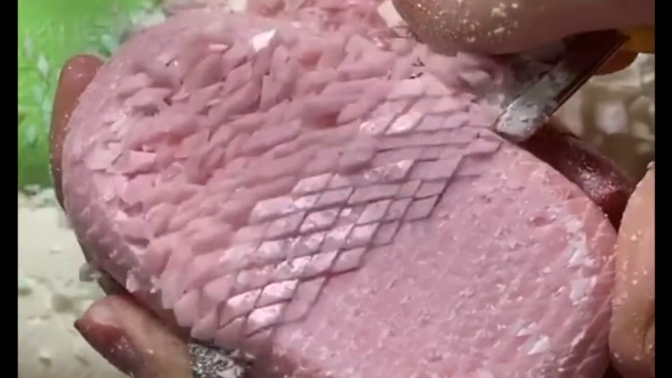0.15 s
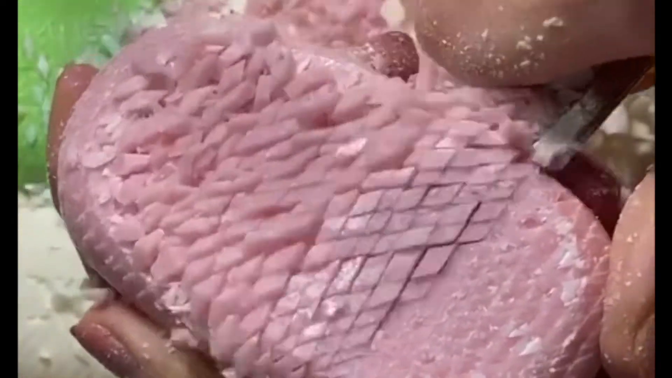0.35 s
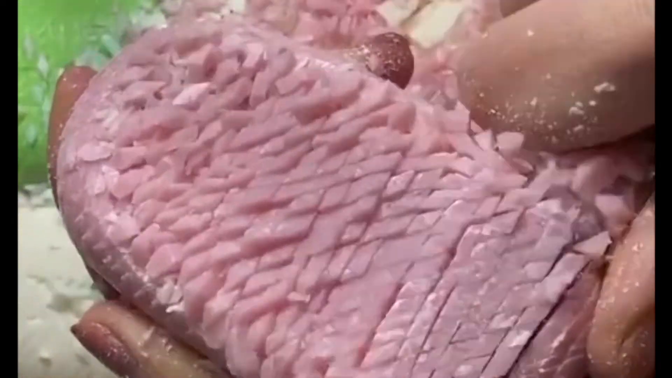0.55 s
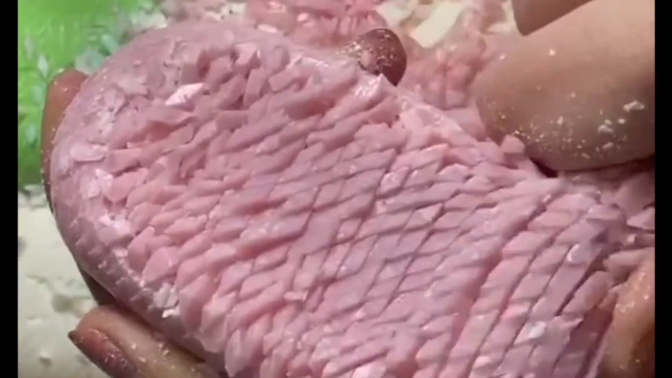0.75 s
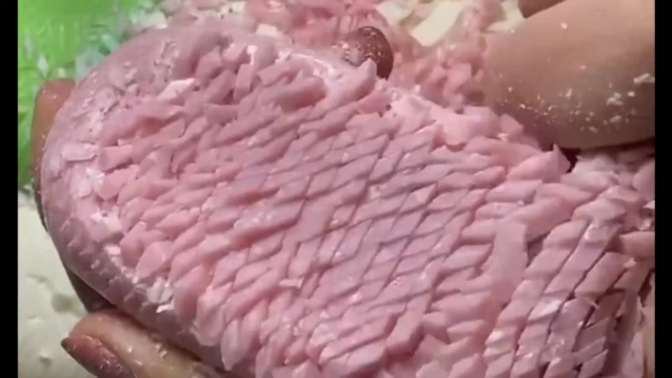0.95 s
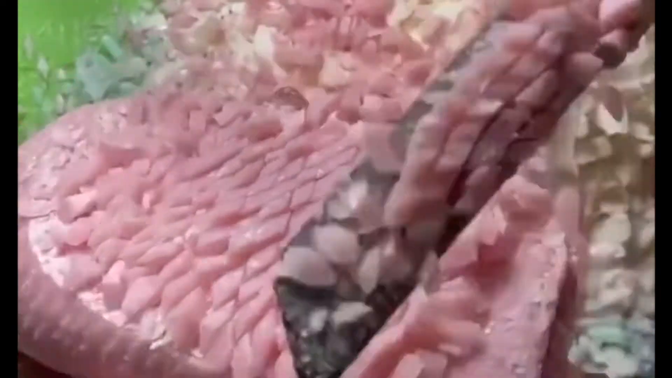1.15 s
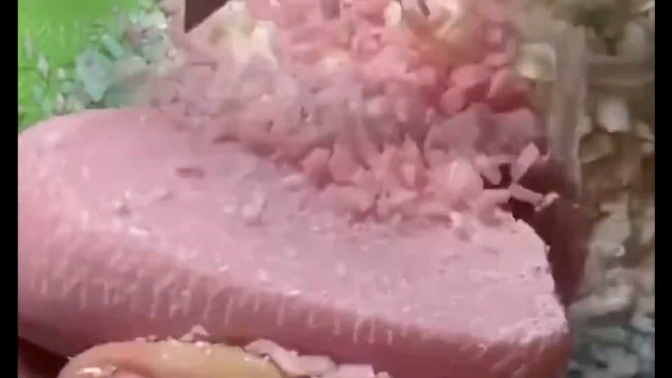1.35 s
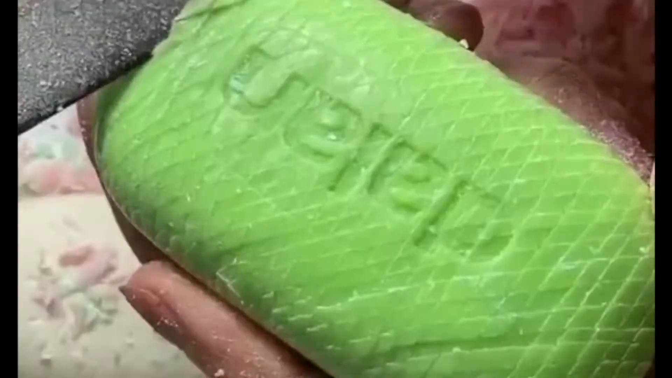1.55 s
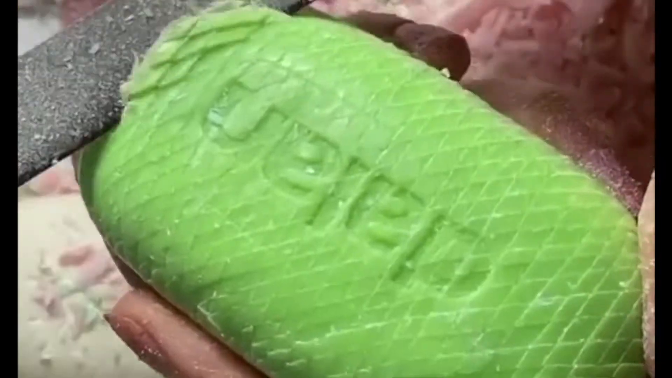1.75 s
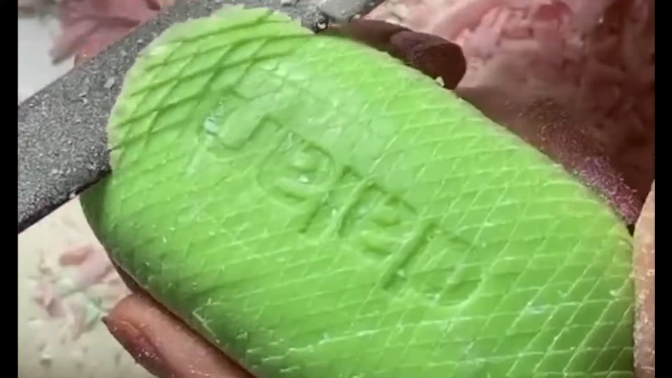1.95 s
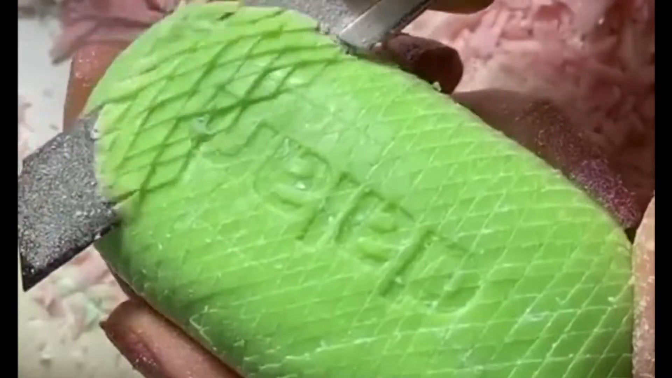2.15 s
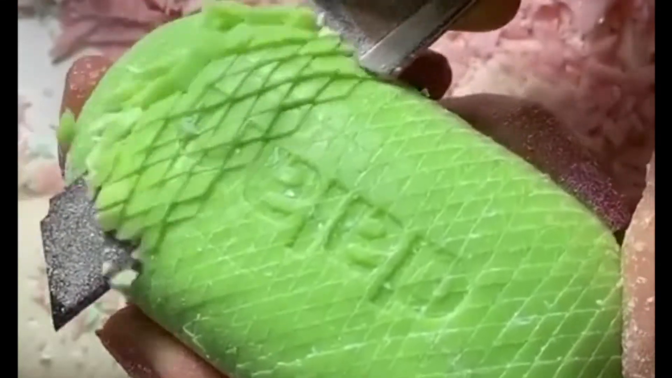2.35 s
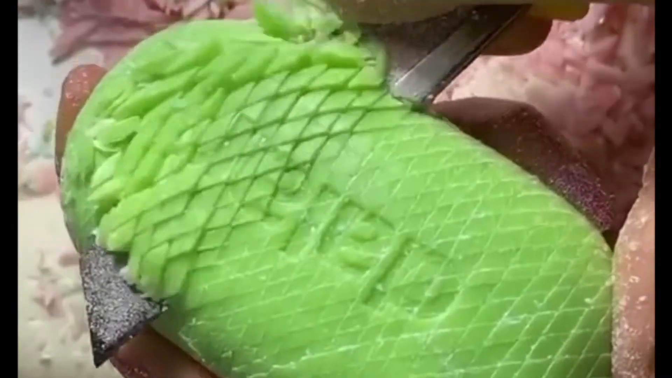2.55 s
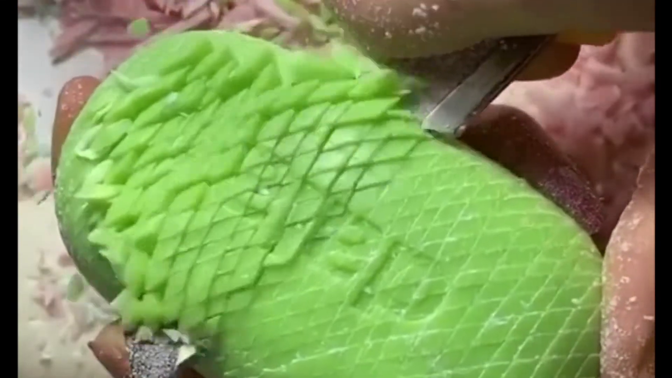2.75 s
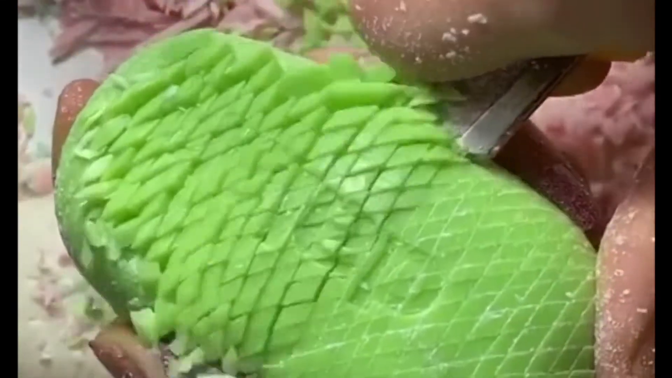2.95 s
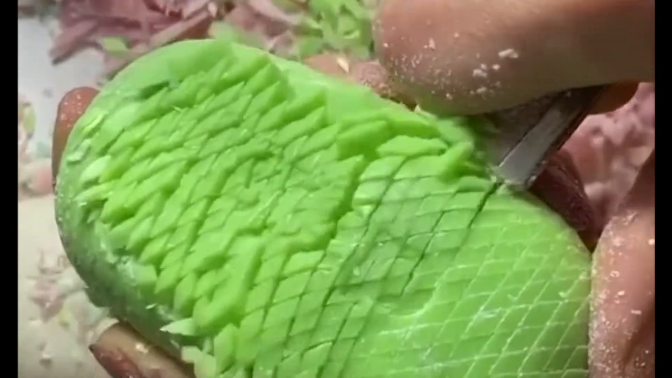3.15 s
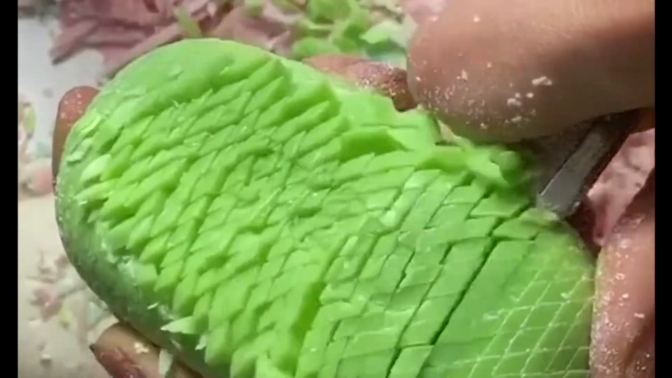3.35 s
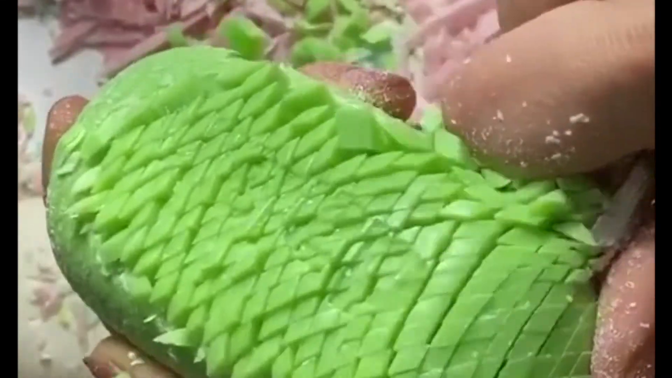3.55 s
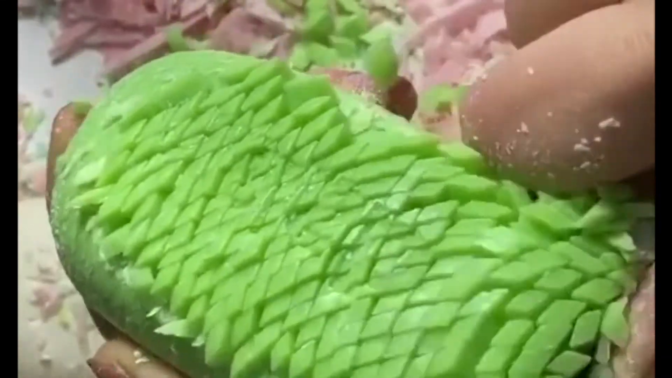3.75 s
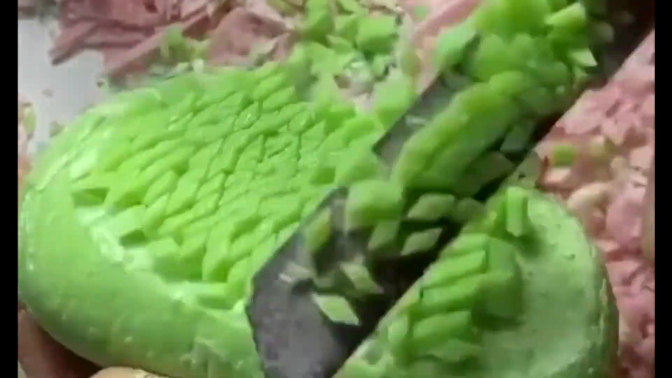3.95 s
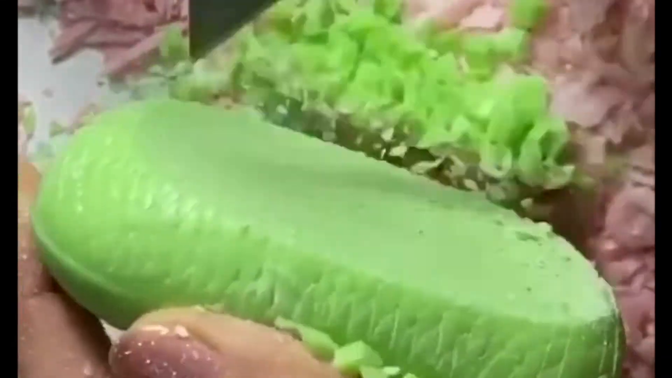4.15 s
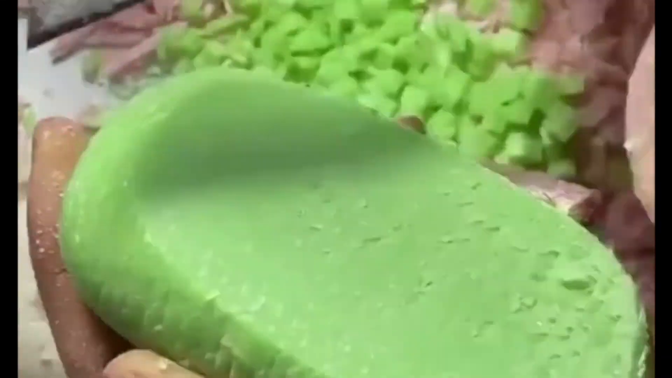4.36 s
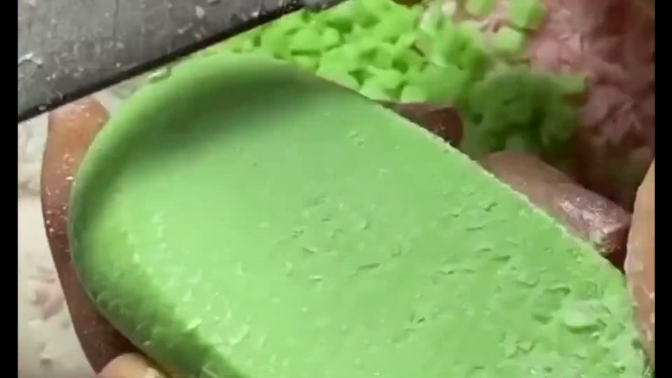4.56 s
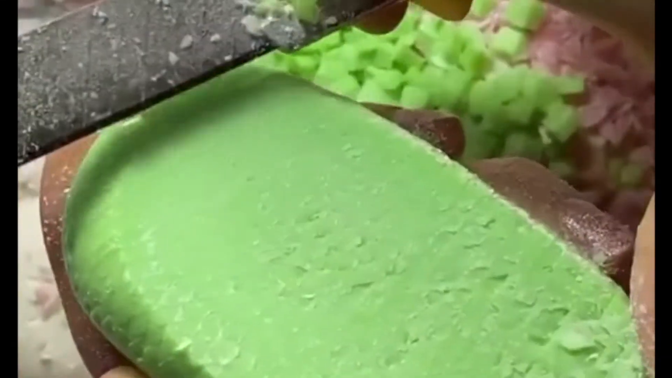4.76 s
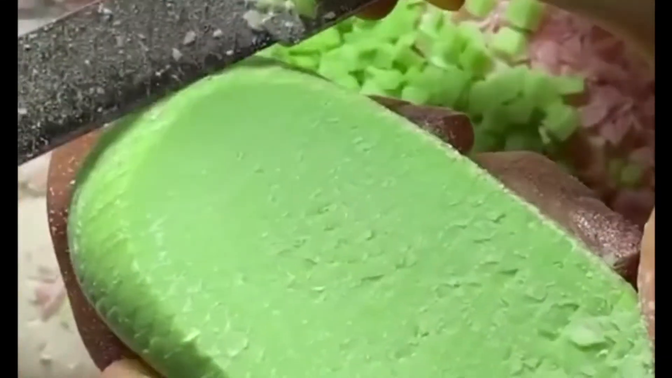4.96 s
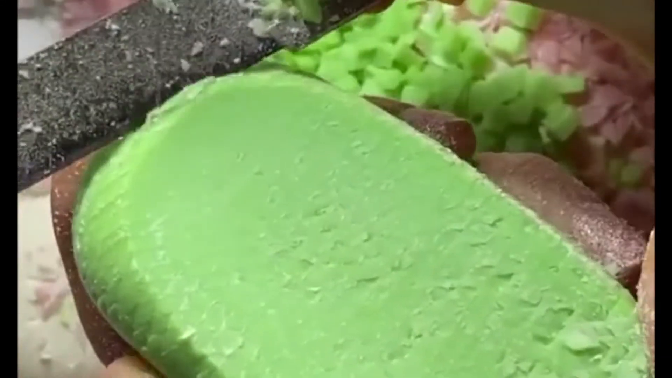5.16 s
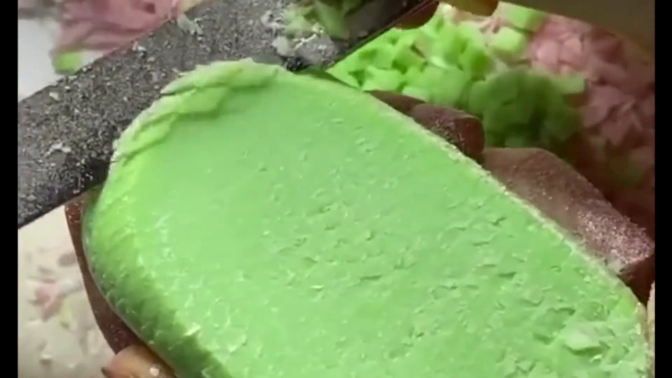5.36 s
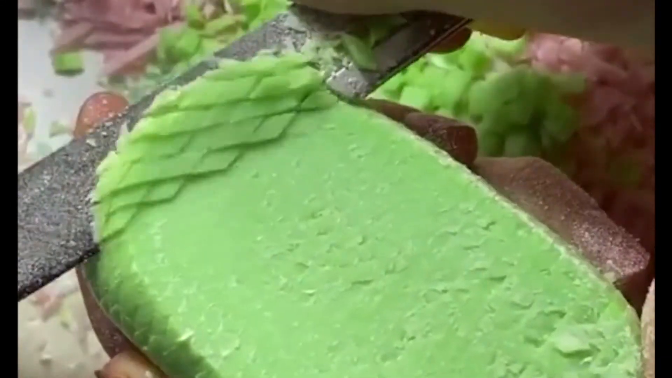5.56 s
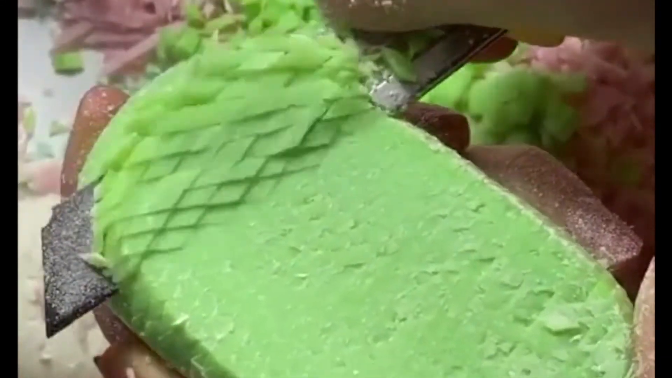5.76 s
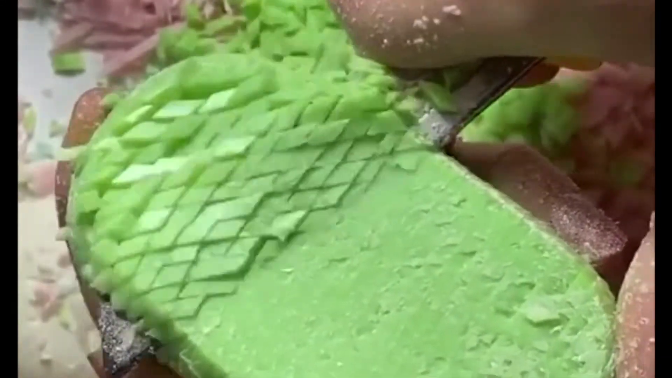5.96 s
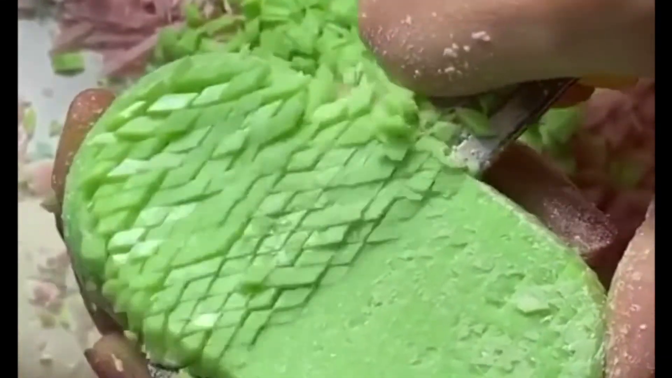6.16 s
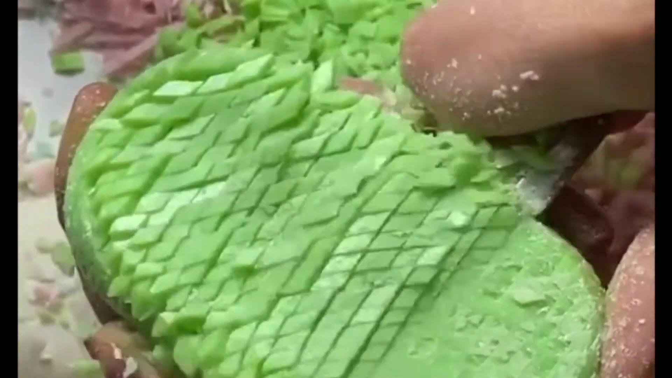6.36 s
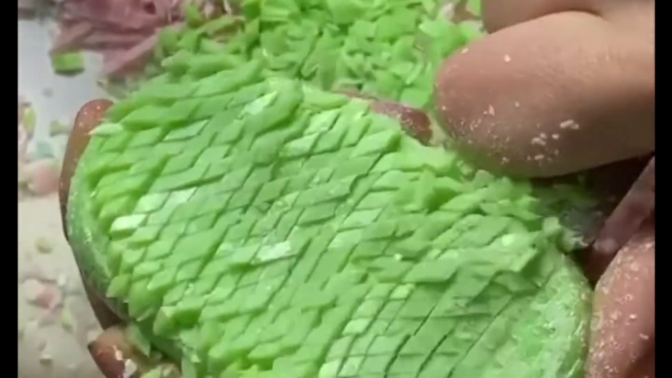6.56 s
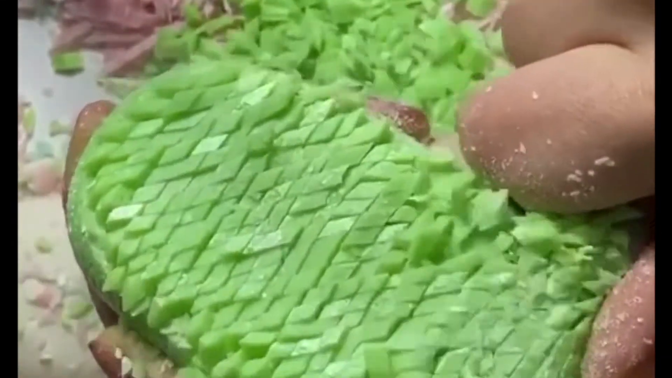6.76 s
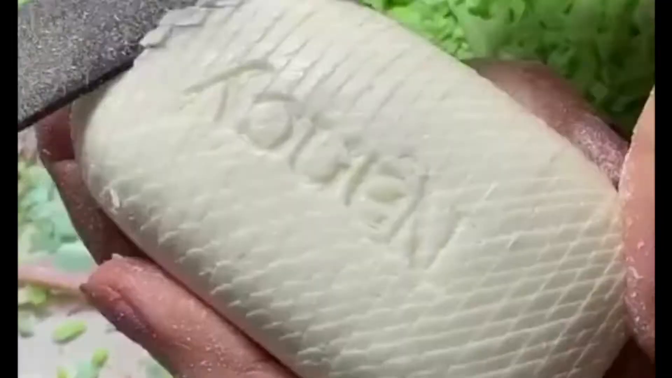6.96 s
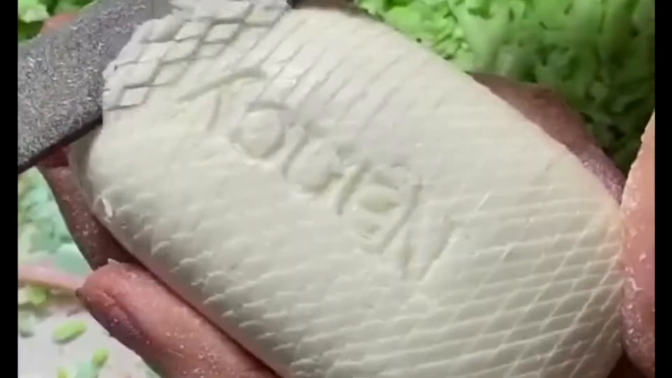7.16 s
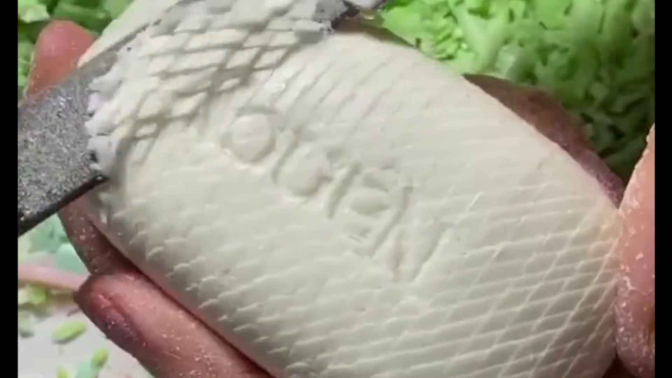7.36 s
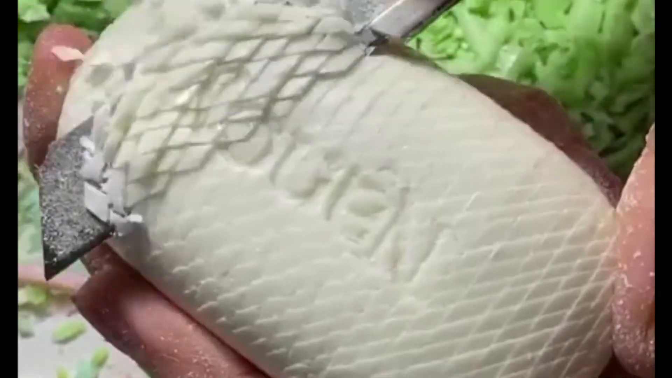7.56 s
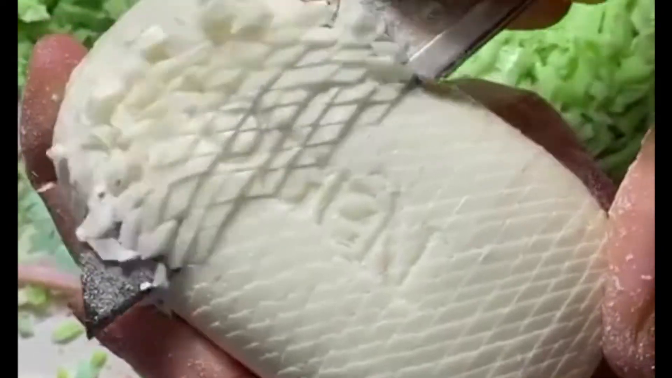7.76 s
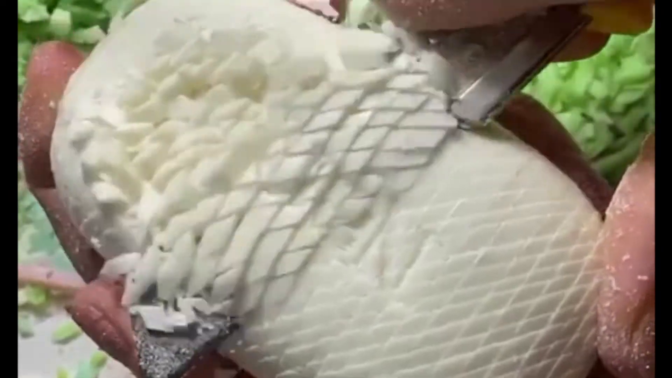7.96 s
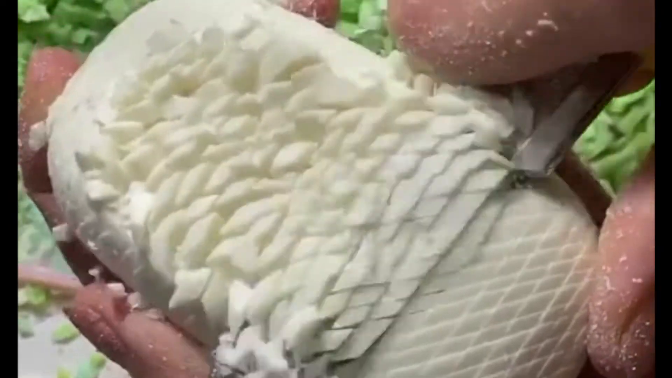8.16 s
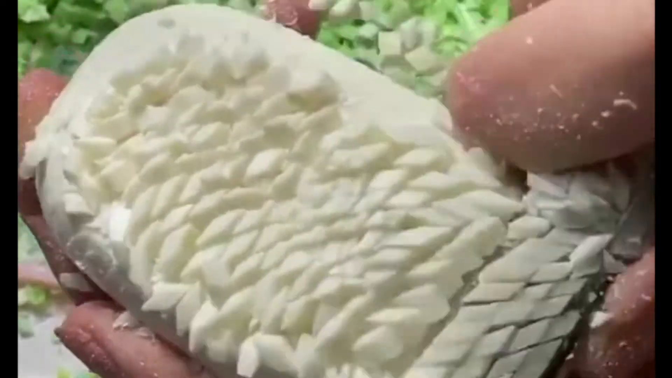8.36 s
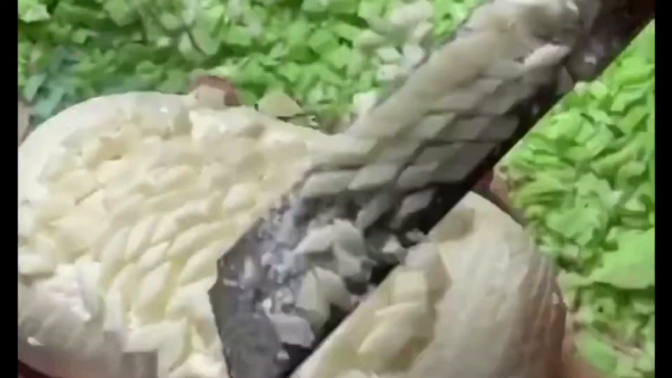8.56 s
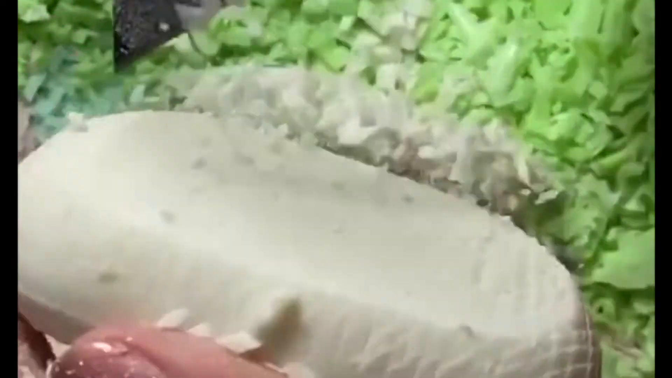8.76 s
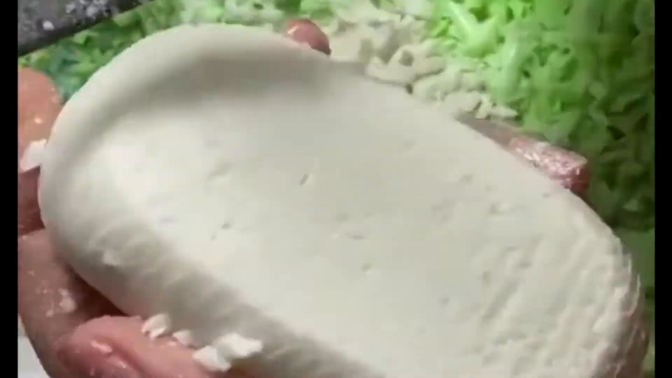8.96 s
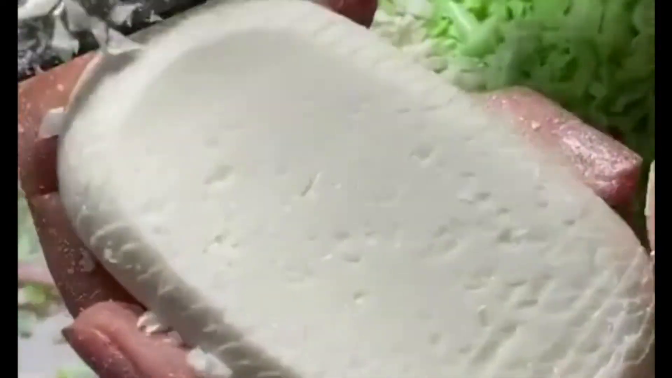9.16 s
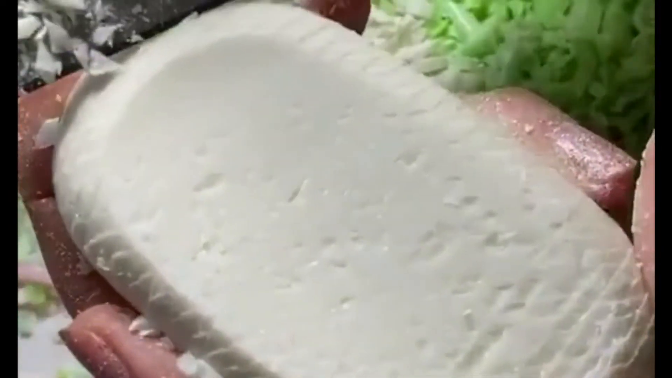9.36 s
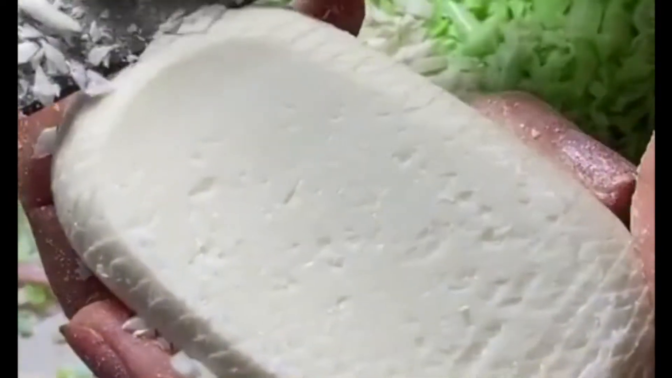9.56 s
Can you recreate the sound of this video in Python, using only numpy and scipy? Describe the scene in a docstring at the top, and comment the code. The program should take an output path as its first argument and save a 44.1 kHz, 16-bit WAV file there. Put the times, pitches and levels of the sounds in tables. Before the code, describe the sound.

Close, brittle crackling and crunching as a blade cuts dry soap into little cubes, with dull knocks and soft swishes of falling crumbs.

```python
"""A crackling flurry of sharp snaps: a knife is pushed through scored bars of dry soap, close to a
two-port microphone in a small quiet room. Cubes and finer crumbs part by brittle fracture, each crack an
impulse that excites the damped modes of bar and cubes as a thud, a ring and a sizzle. Blade and falling
chunks knock, the hands rumble through the bar and loose crumbs slide off in soft swishes.
The blade rests between passes, and twice the whole sound dips abruptly and recovers."""
import sys
import numpy as np
from scipy import signal
from scipy.fft import rfft, irfft, next_fast_len
from scipy.io import wavfile
from scipy.ndimage import uniform_filter1d

SR = 44100
rng = np.random.default_rng(int(sys.argv[2]) if len(sys.argv) > 2 else 0)


def wav_record(signal):
    """Record a signal, one row per channel, as 16-bit PCM in the file named by sys.argv[1]."""
    frames = np.transpose(np.atleast_2d(signal))
    bounded = np.clip(frames, -1, 1)
    # unit amplitude maps onto the largest positive 16-bit level
    quanta = np.round(bounded * 32767).astype(np.int16)
    wavfile.write(sys.argv[1], SR, quanta)


N = 424230
N_FFT = next_fast_len(N)
TIME_S = np.arange(N) / SR
BIN_HZ = np.fft.rfftfreq(N_FFT, 1 / SR) + 1  # offset keeps logarithms and quotients finite


def undb(db):
    """Amplitude ratio: a factor of ten for every 20 dB."""
    return 10 ** (np.asarray(db) / 20)


def shape(points):
    """Spectral envelope: gain per bin, with level interpolated over log frequency."""
    hz, db = np.transpose(points)
    return undb(np.interp(np.log(BIN_HZ), np.log(hz), db))


def colour(x, gain):
    """Linear filtering by multiplication of the spectrum."""
    return irfft(rfft(x, N_FFT) * gain, N_FFT)[..., :N]


def unit(x):
    """Normalisation to an rms of 1."""
    return x / np.sqrt(np.mean(x ** 2))


def decay(x, tau_s):
    """First-order relaxation: each impulse leaves an exponential tail."""
    return signal.lfilter([1], [1, -np.exp(-1 / (tau_s * SR))], x)


def port_noise():
    """Partial coherence: weakly correlated noise for the sum and the difference of the ports."""
    noise = rng.standard_normal((2, N))
    return np.array([noise[0], 0.13 * noise[0] + noise[1]])


# Crumb crackle, one list per pass of the blade or fall of crumbs: t/s, ring level/dB, thud level/dB
CRACKLE = [
    [(0, -50, -44.5), (.11, -50, -60), (.3, -36, -44.5), (.4, -27, -39.5), (.49, -24, -35), (.54, -32, -44)],
    [(.59, -39.5, -56), (.86, -53.5, -61.5), (1.08, -58, -57), (1.23, -41, -48.5), (1.39, -52, -58),
     (1.43, -69, -58.5)],
    [(1.55, -67.5, -77), (2.03, -54, -64), (2.27, -49, -59.5), (2.48, -43, -52), (2.77, -42, -56),
     (3, -35.5, -45), (3.2, -42.5, -52), (3.45, -40, -48), (3.57, -41.5, -47.5)],
    [(3.62, -48, -56.5), (3.83, -53, -56.5), (4, -45.5, -54.5), (4.14, -44.5, -47.5), (4.27, -54, -55.5),
     (4.35, -97, -66)],
    [(5.2, -63, -66), (5.46, -51, -59), (5.7, -46, -60), (6.15, -41.5, -51), (6.64, -46.5, -53.5),
     (6.7, -46, -52), (6.84, -49, -69), (6.93, -76, -68.5)],
    [(6.95, -60, -42.5), (7.12, -69, -65), (7.22, -36, -45.5), (7.4, -44.5, -54.5), (7.6, -37, -48.5),
     (7.75, -32, -47.5), (7.95, -41.5, -48.5), (8.05, -25, -40), (8.19, -27, -34)],
    [(8.23, -46, -52), (8.31, -72, -61), (8.51, -58.5, -70), (8.7, -47, -47), (8.77, -61, -56.5),
     (8.92, -53.5, -65), (9, -83.5, -90)],
]
# The blade at rest: start t/s, end t/s
BLADE_RESTS = [(3.67, 3.76), (4.36, 5.19), (8.27, 8.36), (9.01, 9.62)]


def crackle_levels():
    """Amplitude envelopes of the crumbs' thud, ring and sizzle, 40 dB lower while the blade rests."""
    s, ring, thud = np.concatenate(CRACKLE).T
    resting = sum((TIME_S > start) & (TIME_S < end) for start, end in BLADE_RESTS)
    ring_db = np.interp(TIME_S, s, ring) - 40 * resting
    thud_db = np.interp(TIME_S, s, thud) - 40 * resting
    sizzle_db = ring_db - 3 + 0.66 * (thud_db - ring_db)
    return thud_db, ring_db, sizzle_db


def crumbs(break_at, ring_db, patchiness, per_s=800, spread_db=4.5, bunch_db=6, ceiling_db=12):
    """Poisson process of tiny fractures, whose sizes bunch and flare up after each larger break."""
    chance = rng.random((N, 2))
    at = np.flatnonzero(chance[:, 0] < per_s / SR)
    bunching = unit(uniform_filter1d(rng.standard_normal(N), int(.005 * SR)))[at]
    shock = np.minimum(decay(np.bincount(break_at, minlength=N), tau_s=0.0044), 1)[at]
    scatter_db = -spread_db * np.log(1 - chance[at, 1])
    uneven_db = np.minimum(scatter_db + bunch_db * bunching, ceiling_db) + 11 * shock
    # the harder the blade drags, the more the crackle evens out into a scrape
    contrast = patchiness[at] * np.interp(ring_db[at], [-42, -28], [1, .4])
    size = undb((uneven_db - uneven_db.mean()) * contrast)
    return at, size / np.sqrt(np.sum(size ** 2) / N)


# Jolts of the hands: t/s, level/dB
HAND_JOLTS = [(0.51, -59), (0.7, -49.5), (1.39, -48.5), (3.559, -49.5), (5.751, -53), (6.3, -53.5),
              (6.54, -38), (6.78, -44.5), (6.989, -40.5), (7.75, -47)]


def grip(thud_db, floor_db=-61, wander_db=4, jolt_sigma_s=0.034):
    """Amplitude modulation: the rumble level follows blade pressure, wanders and swells at each jolt."""
    wander = unit(uniform_filter1d(rng.standard_normal(N), int(.08 * SR)))
    pressure_db = np.clip(thud_db, floor_db, -37.5) - floor_db
    steady_db = floor_db + 0.8 * pressure_db + wander_db * wander
    jolts = sum(undb(db) * np.exp(-.5 * ((TIME_S - s) / jolt_sigma_s) ** 2) for s, db in HAND_JOLTS)
    return 20 * np.log10(undb(steady_db) + jolts)


# Spectrum of the hand rumble: f/Hz, relative level/dB
RUMBLE_SPECTRUM = [(15, -44), (25, -2), (75, 11.5), (157, 7), (343, -10.5), (492, -12.5), (539, -10),
                   (600, -22), (780, -33), (1320, -120)]


def hands(level_db):
    """Structure-borne sound: the grip rumbles through the bar, nearly alike at both ports."""
    noise = unit(colour(rng.standard_normal((2, N)), shape(RUMBLE_SPECTRUM)))
    difference = undb(-9.0) * noise[1] - 0.067 * noise[0]  # leans to the right
    return undb(level_db) * np.array([noise[0], difference])


# Spectrum of the background noise: f/Hz, relative level/dB
AIR_SPECTRUM = [(15, -33.5), (25, -23.5), (54, 0), (155, -15), (326, -14), (392, -20), (846, -26),
                (1400, -31.5), (6850, -37.5), (14000, -50)]


def air(level_db=-56.5):
    """Noise floor: bass room tone is largely coherent between the ports, microphone hiss is not."""
    sum_gain = shape(AIR_SPECTRUM)
    difference_gain = sum_gain * shape([(100, -12.5), (1000, 1.0), (14000, -3.5)])
    noise = colour(rng.standard_normal((2, N)), np.array([sum_gain, difference_gain]))
    return undb(level_db) * noise / np.sqrt(np.mean(sum_gain ** 2))


# Dull knocks: t/s, thud level/dB, ring level re thud/dB, f/Hz
KNOCK_EVENTS = [(0.006, -27, 3.5, 3520), (0.117, -24.5, -8.5, 2106), (0.779, -23.5, -21, 3340),
                (0.835, -29, 6, 2770), (1.052, -39, 13, 3140), (1.115, -25, 4, 2450),
                (1.157, -34, -12, 1860), (3.323, -24, -0.5, 3140), (3.338, -19.5, 8, 3814),
                (3.539, -16.5, -3, 1418), (3.843, -31.5, -6.5, 2480), (3.898, -34, -6, 2420),
                (4.271, -33.5, -10, 2900), (4.813, -41.5, -20, 582), (5.232, -46, -21, 2060),
                (5.554, -36.5, 3, 2780), (6.488, -20.5, 0.5, 1040), (6.508, -12.5, -10, 1030),
                (6.561, -13, -6.5, 1060), (6.616, -21.5, -15.5, 1050), (6.7596, -3.5, -20, 1926),
                (6.7605, -2, -25, 1058), (6.7627, -11.5, -23.5, 363), (6.7651, -9.5, -19.5, 2510),
                (6.969, -24.5, 4, 1843), (8.372, -40.5, 0, 2990), (8.87, -39, 8, 2750),
                (8.895, -52, 0, 3000), (9.457, -34.5, -16.5, 1730), (9.509, -46, 9.5, 501)]


def knocks():
    """Impact excitation: the blade strikes the bar and chunks land."""
    s, thud_db, relative_ring_db, pitch_hz = np.transpose(KNOCK_EVENTS)
    return s, thud_db, thud_db + relative_ring_db, pitch_hz


# Cubes snapping off: t/s, ring level/dB, thud level re ring/dB, f/Hz, sizzle level re ring/dB
CUBE_SNAPS = [(0.0151, -8, -36, 6000, -20), (0.027, -11, -22, 6000, -18), (0.0314, -19, -21.5, 5850, -8),
              (0.037, -15.5, -18, 5940, -5.5), (0.0679, -10.5, -23, 6100, -10),
              (0.0763, -10, -21, 5770, -17), (0.1034, -23.5, -27, 5800, -19), (0.1117, -9, -16, 5700, -18),
              (0.1598, -11.5, -13, 5600, -9.5), (0.166, -9.5, -14, 5560, -14),
              (0.1902, -12, -3.5, 5410, -10.5), (0.1918, -13, -14, 5760, -10.5),
              (0.2247, -10, -12.5, 5500, -18.5), (0.2304, -19, -8.5, 5570, -17.5),
              (0.2415, -11, -12, 6200, -8), (0.2675, -17.5, -9, 6260, -8), (0.2765, -10, -19, 5550, -17),
              (0.2807, -9.5, -18, 5690, -9), (0.3582, -7, -13, 5740, -36.5),
              (0.364, -5.5, -9.5, 6100, -9.5), (0.371, -9, -23.5, 5900, -24.5),
              (0.3834, -13.5, -17, 5670, -4.5), (0.43, -6, -7, 5800, -26), (0.447, -14, -2, 5570, -23.5),
              (0.4576, -9.5, -6, 6030, -20), (0.4607, -15.5, -11, 5440, -21.5),
              (0.4676, -13.5, -7, 6410, -21.5), (0.4756, -10, -17, 5740, -21), (0.478, -16, 3.5, 5670, -20),
              (0.4906, -8, -1, 5870, -22.5), (0.4966, -13, 0, 5210, -22.5), (0.5227, -5, -5, 5570, -16.5),
              (0.549, -9.5, -32, 5000, -17), (0.5854, -11, -24, 4870, -20), (0.6072, -19, -20, 6180, -4),
              (0.6229, -11, -12.5, 5870, -2), (0.6799, -4, -7, 5440, -14), (0.7791, -27.5, -8.5, 6400, -11),
              (1.649, -34.5, -14, 6000, -6), (1.7198, -20.5, -16.5, 5960, -1),
              (1.7313, -28.5, -11, 5750, -4), (1.7833, -23.5, -18, 6090, -7),
              (1.8003, -18, -15.5, 6100, 0.5), (1.8677, -15, -17, 5540, -4.5), (1.9086, -28, -25, 5710, -1),
              (1.928, -15.5, -17, 6060, -5), (1.942, -24, -10, 5400, -8),
              (1.9809, -11.5, -20.5, 6300, -8.5), (2.0028, -19, -22, 5700, -6),
              (2.014, -8.5, -25.5, 5840, -10), (2.0555, -16, -25.5, 6370, -18), (2.0735, -36, -35, 6850, 8),
              (2.087, -24.5, -40, 6540, -11), (2.103, -22, -28, 6500, -5), (2.1226, -11.5, -46, 6900, -9.5),
              (2.1484, -12, -17.5, 7200, -8.5), (2.1804, -22, -21, 6860, -7),
              (2.192, -18.5, -14.5, 7240, -11), (2.2066, -14, -38, 6400, -5), (2.2596, -12, -44, 6460, -13),
              (2.2658, -25, -13, 6740, 0), (2.291, -17.5, -31, 6340, -18), (2.303, -7, -28, 6360, -24),
              (2.32, -8, -21, 6520, -12), (2.334, -11, -25, 6390, -12), (2.3491, -10, -20, 5750, -8),
              (2.3631, -25.5, -14, 6760, 5), (2.375, -23, -23, 6790, -20), (2.3901, -7, -19, 6250, -15),
              (2.4255, -23, -21, 5830, -14), (2.4301, -3, -21, 6150, -11.5), (2.4521, -20, -23, 6000, -24),
              (2.467, -29.5, -21, 6700, 13), (2.4725, -11, -16, 5810, -18), (2.4827, -9, -23, 5940, -13),
              (2.5037, -19, -25, 6590, -12), (2.529, -10.5, -35, 6240, -16),
              (2.5458, -12.5, -12, 5900, -25), (2.563, -7, -33, 5700, -11.5),
              (2.582, -15, -12.5, 5880, -18), (2.5922, -16, -25, 5450, -12), (2.6055, -8.5, -29, 5600, -14),
              (2.6162, -12.5, -14, 5620, -13), (2.6435, -17, -11, 5710, -8),
              (2.6716, -13.5, -9.5, 6450, -7.5), (2.697, -8, -32.5, 5700, -23),
              (2.7406, -24, -33, 6040, -7), (2.7574, -28, -36, 5700, -17), (2.8009, -22.0, -28, 5960, -8),
              (2.809, -16, -2, 5590, -7), (2.846, -21.5, -5, 5800, -9), (2.8602, -11, -14, 5700, -14),
              (2.896, -19, -24, 6000, -29), (2.9148, -20, -31, 6290, -5), (2.9266, -22, -25, 5680, -27),
              (2.936, -7.5, -25, 5670, -17), (2.9664, -20, -33, 5780, -25),
              (2.9741, -10.5, -35, 6200, -7.5), (2.98, -5, -25, 5200, -9), (3.0247, -15, -30, 6370, -8),
              (3.0344, -21, -31, 6040, 0), (3.039, -9.5, -29, 4800, -13), (3.0735, -18, -14, 5930, -9),
              (3.295, -13, -18.5, 5980, -8), (3.3119, -10.5, -5.5, 5600, -5),
              (3.5027, -15.5, -10, 5000, -19), (3.5308, -1, -21, 4660, -17.5),
              (3.7745, -23.5, -5.5, 7100, -15), (3.9212, -17, -4.5, 4560, -20),
              (4.126, -26, -23, 7060, 2.5), (4.1784, -17, -6, 4870, -13), (4.2569, -31, -26, 6320, 6),
              (5.326, -27, -10, 5660, -11), (5.405, -26.5, -4, 6200, -2), (5.4396, -34, -29, 7090, 3),
              (5.4905, -35, -28, 6720, 11), (5.5317, -42, -32, 5900, -18), (5.585, -25, -15, 6000, -2),
              (5.6089, -22.5, -13, 5600, -2.5), (5.6741, -25, -13, 6590, -8),
              (5.6854, -17.5, -16, 6440, -12), (5.6967, -26, -23, 6110, -1), (5.7316, -18, -26, 6030, -8),
              (5.7366, -18, -8, 5570, -5), (5.7563, -19, -11, 6400, -3), (5.788, -22, -14, 5900, -10),
              (5.8, -19, -17, 5860, -9), (5.849, -17, -40, 6070, -13), (5.8966, -44, -26, 6260, -13),
              (5.9008, -41, -32, 6060, -1), (5.9849, -13.5, -20, 6500, -10),
              (6.1125, -22.5, -25, 5880, -5.5), (5.936, -30, -8, 6200, -8), (6.149, -19, -9, 5700, -12),
              (6.2086, -22.0, -26, 5990, -31), (6.2196, -7, -21.5, 5800, -10),
              (6.2318, -10, -26, 5760, -15), (6.2408, -16, -22, 5490, -23), (6.2731, -11, -21, 5900, -12.5),
              (6.2841, -14.5, -14, 5900, -23), (6.2946, -18, -23, 5640, -28),
              (6.5958, -21, -24.5, 6100, -19), (6.6024, -26.5, -24, 5740, -12.5),
              (6.7223, -7, -9.5, 5540, -4), (6.7619, 3.5, -4.5, 4540, -13), (6.7685, -16, 1, 4570, -20),
              (6.977, -14, -5.5, 6250, -11.5), (7.025, -11.5, -25, 5660, -15), (7.061, -15, -11, 6100, -29),
              (7.066, -22, -10, 6680, 0), (7.0806, -15, -14, 6300, -18), (7.1083, -22, -29, 5700, -5),
              (7.152, -10.5, -38, 5400, -12.5), (7.1563, -20, -4, 5280, -6), (7.2007, -15.5, -8, 5550, -9),
              (7.2047, -14, -15, 6900, -7), (7.2428, -12.5, -15, 5560, -9), (7.2577, -8.5, -28, 5830, -12),
              (7.266, -16.5, -3.5, 5670, -17), (7.2787, -20.5, -4, 5590, 1.5),
              (7.3184, -18.5, -38, 6200, -3.5), (7.3279, -11, -46, 6200, -11),
              (7.3726, -12.5, -15, 6000, -14.5), (7.3814, -14.5, -13, 4960, -8),
              (7.4194, -14.5, -22, 6010, -18), (7.4254, -6, -12.5, 5800, -7.5),
              (7.456, -13.5, -11, 6670, -12), (7.4616, -20, -8, 7150, -9), (7.4806, -14.5, -9, 5940, -13),
              (7.4887, -21.5, -22, 5770, -12.5), (7.509, -17.5, -31, 6380, -4.5),
              (7.5131, -6, -22, 5500, -16), (7.5244, -10.5, -13.5, 5550, -9), (7.5301, -5, -20, 6700, -17),
              (7.5459, -3, -19, 6350, -13), (7.566, -24.5, -18, 5970, -8.5), (7.5726, -11.5, -31, 5830, -5),
              (7.5747, -3, -21, 5500, -18.5), (7.6062, -10.5, -32, 5700, -16.5),
              (7.636, -12, -36, 5870, -11), (7.6835, -18, -28, 5730, -15), (7.6905, -8, -28, 6200, -11),
              (7.6941, -22, -7.5, 6150, -18.5), (7.704, -4.5, -24, 6100, -14.5),
              (7.7101, -7, -22, 5890, -11.5), (7.721, -16, -13, 5970, -11.5),
              (7.7574, -7.5, -28.5, 5650, -15.5), (7.7608, -9.5, -9.5, 5800, -0.5),
              (7.7818, -15.5, -6, 5570, -5.5), (7.789, -4.5, -14.5, 6100, -8.5),
              (7.7952, -14.5, -28.5, 6120, 0), (7.8087, -10, -27, 5920, -9), (7.8163, -9, -15, 6500, -14),
              (7.843, -9.5, -30, 6190, -26.5), (7.8485, -6.5, -18, 5470, -11),
              (7.8527, -8.5, -20, 5610, -13.5), (7.8578, -15.5, -39, 5800, -18),
              (7.8758, -0.5, -30, 5300, -30), (7.8799, -10, -12, 5670, -18),
              (7.8926, -1, -12.5, 5120, -19.5), (7.897, -2, -20, 4930, -11), (7.906, -20, -31, 5870, -13),
              (7.911, -2.5, -14.5, 6090, -14), (7.9439, -10, -32, 5950, -9),
              (7.9776, 3.5, -28.5, 5300, -24), (7.9802, -8, -35.5, 5600, -10.5),
              (7.9867, -5, -18.5, 5550, -21), (7.9974, -12, -25, 5610, -26),
              (8.0047, -11, -17, 5560, -14.5), (8.0116, -9, -20.5, 5450, -19),
              (8.028, -5.5, -31, 5600, -18), (8.056, -8, -20, 5160, -15), (8.0776, -4.5, -21, 5400, -15),
              (8.0818, -11.5, -9, 5400, -21), (8.1117, -7, -25, 5300, -27.5),
              (8.1955, -9.5, -18, 6840, -10), (8.255, -34.5, -20, 7000, -2), (8.2991, -39.5, -13, 6600, 3),
              (8.4832, -32.5, -19, 5960, 3.5), (8.5483, -28, -15.5, 6900, -5),
              (8.9185, -29.5, -6, 6910, -6), (9.5772, -26, -11.5, 6350, -16.5), (9.6059, -24, -2, 6330, -7)]


def snaps():
    """Brittle fracture: each cube releases its stored strain as one impulse."""
    s, ring_db, relative_thud_db, pitch_hz, relative_sizzle_db = np.transpose(CUBE_SNAPS)
    return s, ring_db + relative_thud_db, ring_db, pitch_hz, ring_db + relative_sizzle_db


def lesser_snaps(crumb_ring_db, per_s=14, above_crumbs_db=10.5, ceiling_db=-30.5):
    """Jittered impulse train: small fractures at random instants follow the level of the crackle."""
    count = int(per_s * N / SR)
    s = (np.arange(count) + rng.random(count)) / per_s
    ring_scatter, thud_scatter, pitch_scatter = rng.standard_normal((count, 3)).T
    ring_db = crumb_ring_db[(s * SR).astype(int)] + above_crumbs_db - 2.5 * np.clip(ring_scatter, -1, 2)
    ring_db = np.minimum(ring_db, ceiling_db)
    thud_db = ring_db - 9.5 + 3.0 * thud_scatter
    return s, thud_db, ring_db, 5900 * np.exp(.09 * pitch_scatter)


# Brightness with the blade at rest, entering and buried: crumb ring level/dB, change of sizzle level/dB
BRIGHTNESS = [(-77.5, -6), (-58, -0.5), (-34.5, 1.5), (-32, -3.5)]


def breaks(crumb_ring_db):
    """Superposition of impulses: knocks and lesser snaps get a sizzle level and join the cube snaps."""
    s, thud_db, ring_db, pitch_hz = np.hstack([knocks(), lesser_snaps(crumb_ring_db)])
    sizzle_db = -21 + 0.39 * ring_db + 6 * rng.standard_normal(len(s))
    sizzle_db += np.interp(crumb_ring_db[(s * SR).astype(int)], *np.transpose(BRIGHTNESS))
    return np.hstack([snaps(), (s, thud_db, ring_db, pitch_hz, sizzle_db)])


def excitation(at, size, noise, rise_s, tail_s, rattle_db):
    """Transient excitation: a click with a very brief swell of noise before it and a short rattle after."""
    clicks = np.bincount(at, size, minlength=N)
    energy = clicks ** 2
    after = decay(energy, tail_s)
    before = np.maximum(decay(energy[::-1], rise_s)[::-1] - energy, 0)
    return clicks * np.array([[1], [.7]]) + undb(rattle_db) * np.sqrt(after + before) * noise


def mode_shares(pitch_hz, modes, scatter_db=3.5, favour_db=13, log_width=.15):
    """Energy partition: a break feeds the modes unevenly, favouring those near its pitch."""
    mode_hz = np.array(modes)[:, :1]
    scatter = rng.standard_normal((len(pitch_hz), len(modes))).T
    nearness = np.exp(-(np.log(mode_hz / pitch_hz) / log_width) ** 2)
    share = undb(scatter_db * scatter + favour_db * nearness)
    polarity = (-1.) ** np.arange(len(modes))[:, None]
    return polarity * share / np.sqrt(np.mean(share ** 2, axis=0))


# Spectra of breaking soap in the sum and the difference of the ports: f/Hz, relative level/dB
SUM_SPECTRUM = [(180, -14.5), (300, -13), (494, -11), (537, -15.5), (725, -13.5), (1150, -13),
                (1580, -10.5), (1810, -9), (3240, -8), (3950, -3.5), (4830, 2), (5700, -0.5), (6960, 2.5),
                (8940, -17), (12700, -11.5), (16000, -73.5)]
DIFFERENCE_SPECTRUM = [(180, -56), (300, -46), (737, -15.5), (1320, -19), (1900, -8.5), (3460, -10),
                       (5430, -6), (7950, -1.5), (10600, -11.5), (13100, -38.5), (16000, -36)]
# Phase of the difference against the sum: f/Hz, phase/rad
PORT_PHASE = [(500, 4.9), (1400, 1.9), (3000, 2.2), (6000, 4.57), (9000, 5.6), (13000, 4.1)]


def zone_response(modes):
    """Transfer functions: two resonators in cascade per mode, and port gains normalised in power."""
    phase = np.interp(BIN_HZ, *np.transpose(PORT_PHASE))
    ports = np.array([shape(SUM_SPECTRUM), shape(DIFFERENCE_SPECTRUM) * np.exp(1j * phase)])
    resonances = [1 / (1 + 1j * (BIN_HZ - hz * hz / BIN_HZ) / width) ** 2 for hz, width in modes]
    power = sum(np.mean(np.abs(resonance * ports[0].real) ** 2) for resonance in resonances)
    return resonances, ports / np.sqrt(power)


# Resonance as the blade travels along the bar: t/s, thud f/Hz, crumb ring f/Hz, crackle patchiness/1
BAR_RESONANCE = [(0, 1040, 6000, 1.2), (.55, 953, 5200, 1.3), (1.1, 2470, 6300, 0.72),
                 (2.2, 1830, 6700, 1.17), (2.6, 1620, 5650, 1.25), (3.5, 1620, 5360, 0.65),
                 (5.6, 2300, 6100, 1.15), (6.1, 2130, 6050, 0.51), (6.349, 1100, 5860, 0.36),
                 (7.3, 1500, 5500, 1.12), (7.7, 650, 5880, 0.9), (8.2, 590, 5250, 1.1),
                 (8.5, 2540, 6440, 0.84)]
# Modes of bar and cubes, one list each for the thud, ring and sizzle zones: f/Hz, bandwidth/Hz
SOAP_MODES = [
    [(350, 290), (700, 418), (1050, 380), (1550, 326), (1930, 346), (2550, 1250), (3300, 550)],
    [(4600, 810), (5500, 810), (6200, 910), (7000, 1020), (8300, 210)],
    [(10000, 4430), (11300, 2000), (12700, 1500)],
]


def soap(crumb_levels_db, hand_db):
    """Modal superposition: snaps, knocks and crumbs drive the damped modes of bar and cubes."""
    _, crumb_ring_db, _ = crumb_levels_db
    s, thud_db, ring_db, pitch_hz, sizzle_db = breaks(crumb_ring_db)
    break_at = np.minimum((s * SR).astype(int), N - 1)
    travel_s, bar_hz, crumb_hz, patchiness = np.transpose(BAR_RESONANCE)
    crumb_at, crumb_size = crumbs(break_at, crumb_ring_db, np.interp(TIME_S, travel_s, patchiness))
    at = np.r_[break_at, crumb_at]
    ring_scatter, thud_scatter = rng.standard_normal((len(at), 2)).T
    near_crumb_hz = np.interp(at / SR, travel_s, crumb_hz) * np.exp(.045 * ring_scatter)
    near_bar_hz = np.interp(at / SR, travel_s, bar_hz) * np.exp(.22 * thud_scatter)
    ring_hz = np.r_[pitch_hz, near_crumb_hz[len(s):]]
    thud_hz = np.where(ring_hz < 3800, ring_hz, near_bar_hz)  # low knocks thud at their own pitch
    # per zone: f/Hz, break level/dB, noise envelope (rise t/s, tail t/s, rattle level/dB)
    zones = [(thud_hz, thud_db + 10, (.0013, .002, -20)),
             (ring_hz, ring_db + 7, (.0009, .0012, -18)),
             (ring_hz, sizzle_db + 8, (.0008, .001, -14))]
    noise, spectrum = port_noise(), 0
    for modes, crumb_db, (event_hz, break_db, envelope) in zip(SOAP_MODES, crumb_levels_db, zones):
        resonances, ports = zone_response(modes)
        for resonance, share, (mode_hz, _) in zip(resonances, mode_shares(event_hz, modes), modes):
            # hard pressure makes the lowest modes groan
            groan_db = .65 * (hand_db[crumb_at] + 54) * (mode_hz < 1300)
            size = share * np.r_[undb(break_db), crumb_size * undb(crumb_db[crumb_at] + groan_db)]
            spectrum += ports * resonance * rfft(excitation(at, size, noise, *envelope), N_FFT)
    return irfft(spectrum, N_FFT)[:, :N]


def room(x, level_db=-15, treble_hz=4800):
    """Reverberation: a short diffuse tail decays exponentially, the treble first."""
    t = np.arange(int(.4 * SR)) / SR
    spectrum = rfft(rng.standard_normal((2, len(t))) * undb(-60 * t / 0.26))
    tail = irfft(spectrum / np.sqrt(np.abs(spectrum)), len(t))  # flattening softens ringing notes
    low = signal.sosfiltfilt(signal.butter(6, treble_hz, fs=SR, output="sos"), tail)
    treble = (tail - low) * undb(-3.5 - 60 * t / 0.19)
    onset = 1 - np.exp(-t / 0.00043)
    response = (low + treble) * onset / np.sqrt(np.sum(low ** 2))
    return undb(level_db) * signal.oaconvolve(x[None], response, axes=1)[:, :N]


# Loose crumbs sliding off the bar: t/s, Gaussian width/s, level/dB
CRUMB_SLIDES = [(1.319, 0.033, -34.5), (4.049, 0.052, -34.5), (8.703, 0.041, -38)]
# Spectrum of their swish: f/Hz, relative level/dB
SLIDE_SPECTRUM = [(47, -40), (80, -11), (130, -5), (339, -9), (562, -37), (993, -19.5), (3170, -11),
                  (5480, -15), (6970, -7), (9890, -21.5), (12600, -4), (13400, -31), (15000, -80)]


def slides():
    """Friction noise: many loose crumbs rub over the bar at once and blur into a swish."""
    swell = sum(undb(db) * np.exp(-.5 * ((TIME_S - s) / width) ** 2) for s, width, db in CRUMB_SLIDES)
    return swell * unit(colour(port_noise(), shape(SLIDE_SPECTRUM))) * undb([[0], [-5]])


# Abrupt dips of the whole sound: t/s, recovery time constant/s, change of level/dB
LEVEL_DIPS = [(1.432, 0.028, -27), (6.931, 0.11, -20)]


def dips():
    """Exponential recovery: a gain whose level falls at once and relaxes back."""
    return undb(sum(db * (TIME_S > s) * np.exp(-np.abs(TIME_S - s) / tau) for s, tau, db in LEVEL_DIPS))


def scene():
    """Sum-and-difference stereophony: soap, reverberation, hands and air combine into left and right."""
    thud_db, ring_db, sizzle_db = crackle_levels()
    hand_db = grip(thud_db)
    cutting = soap((thud_db, ring_db, sizzle_db), hand_db) + slides()
    mid, side = cutting + room(cutting[0]) + hands(hand_db) + air()
    balance = undb([[-.4], [.4]])
    return dips() * balance * np.array([mid + side, mid - side])


def record(dry):
    """Clipping and band limiting: peaks stop at full scale, then two low-pass filters cut the top."""
    softened = signal.sosfilt(signal.butter(6, 14200, fs=SR, output="sos"), np.clip(dry, -1, 1))
    return signal.sosfilt(signal.ellip(10, .2, 90, 16300, fs=SR, output="sos"), softened)


dry = scene()
out = record(dry)
wav_record(out)
```